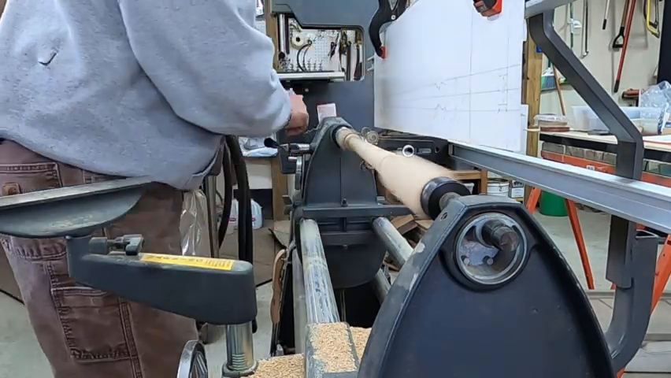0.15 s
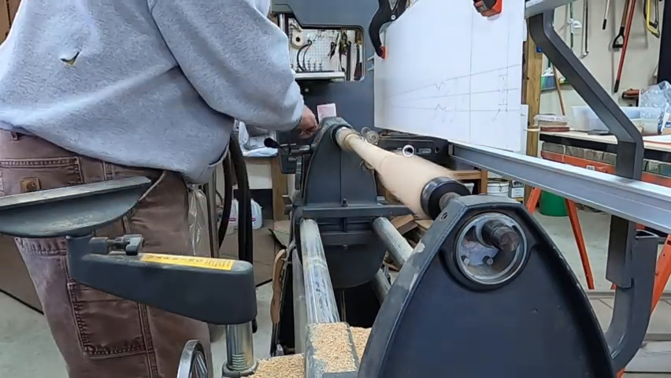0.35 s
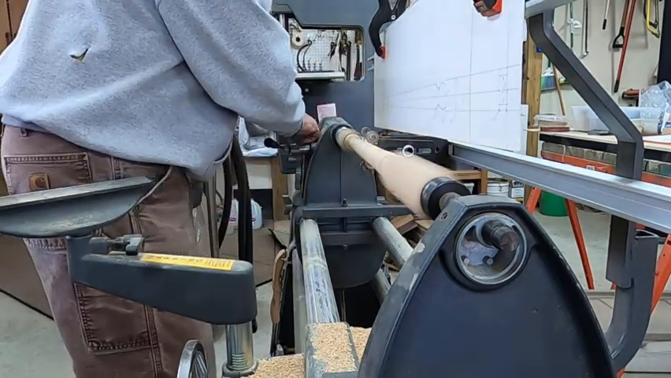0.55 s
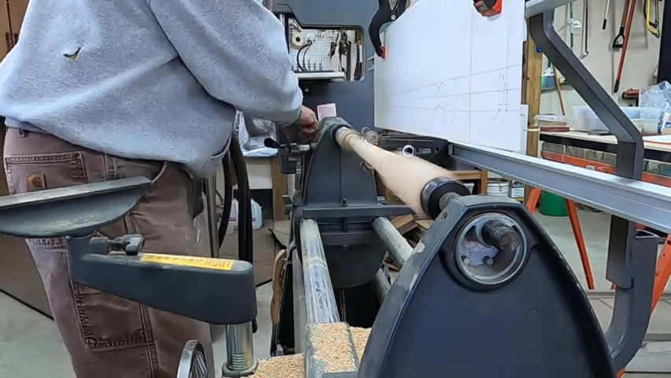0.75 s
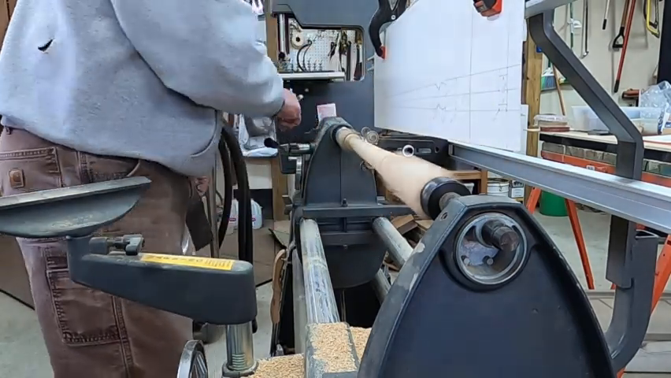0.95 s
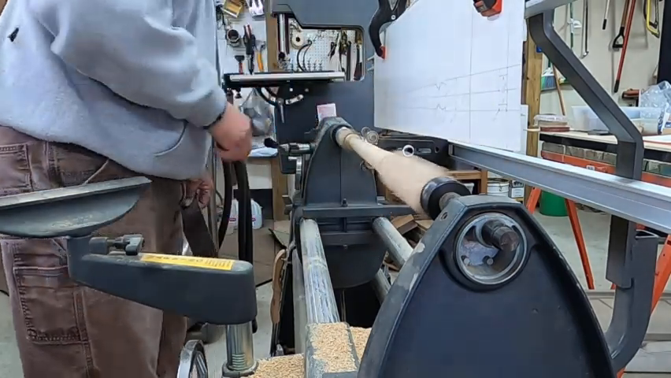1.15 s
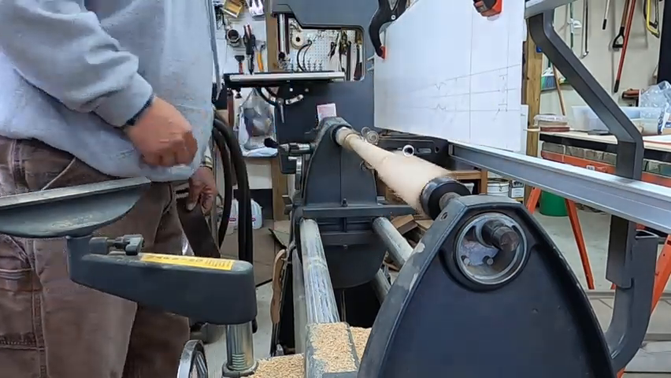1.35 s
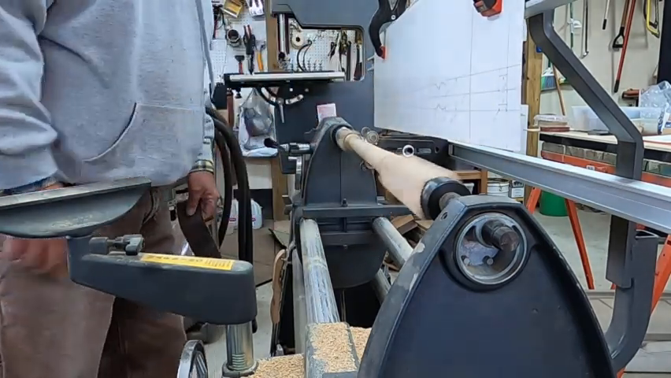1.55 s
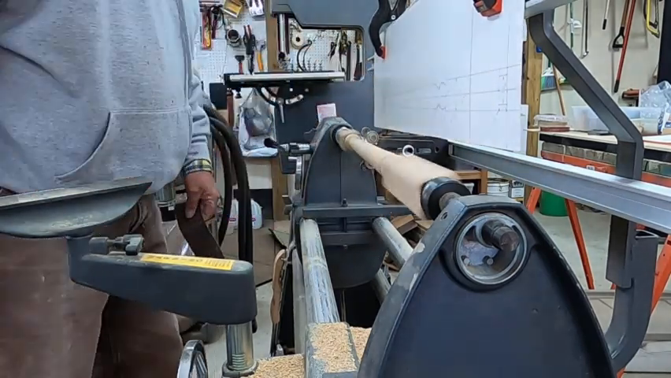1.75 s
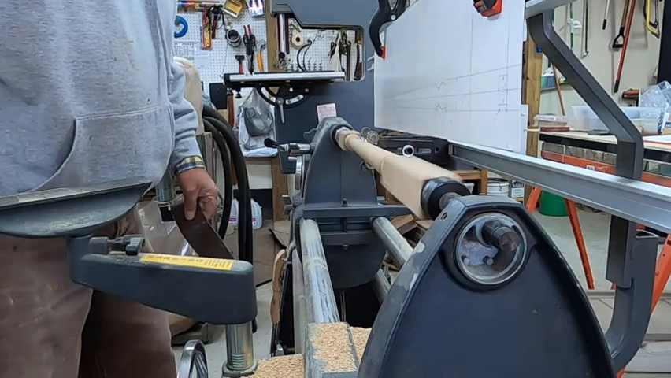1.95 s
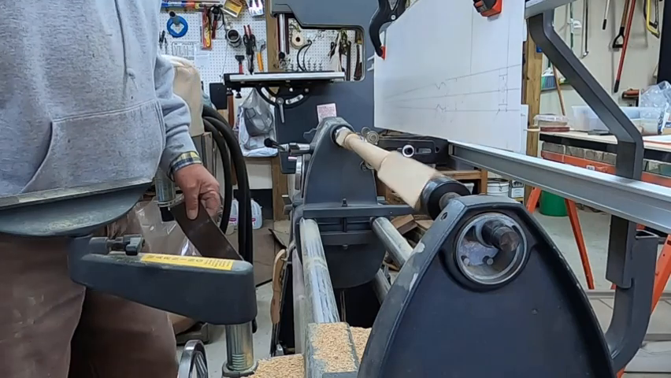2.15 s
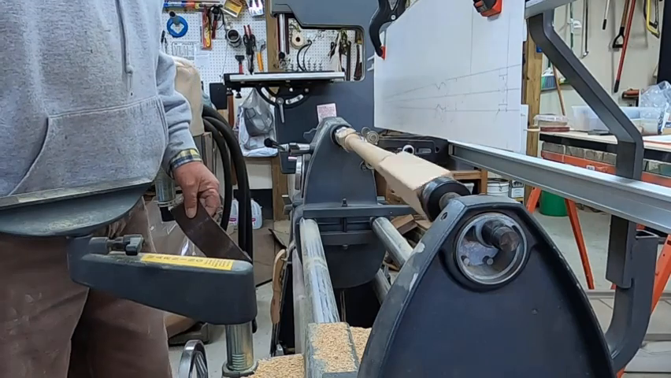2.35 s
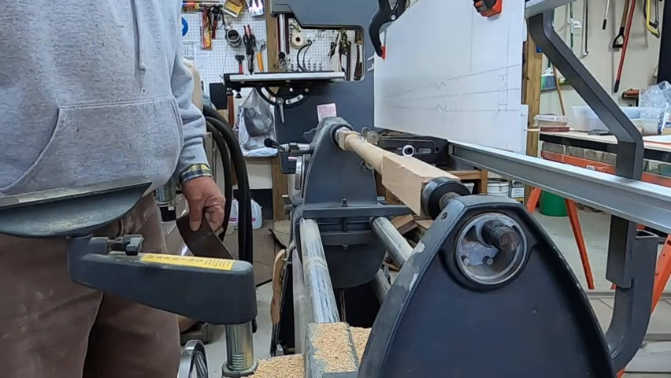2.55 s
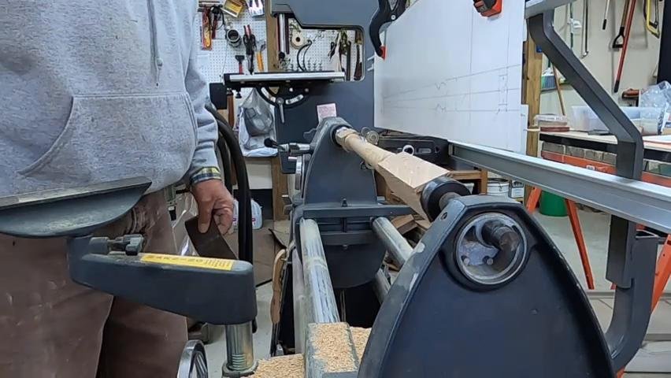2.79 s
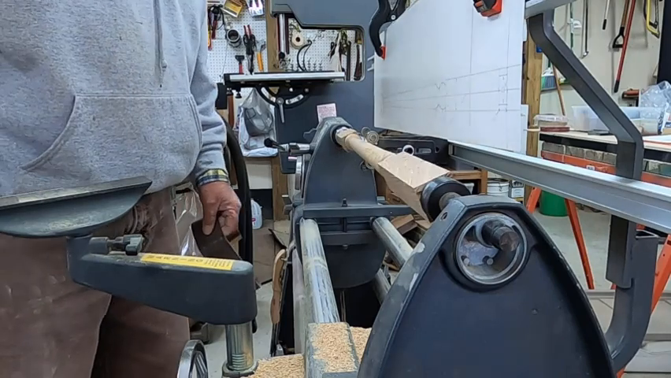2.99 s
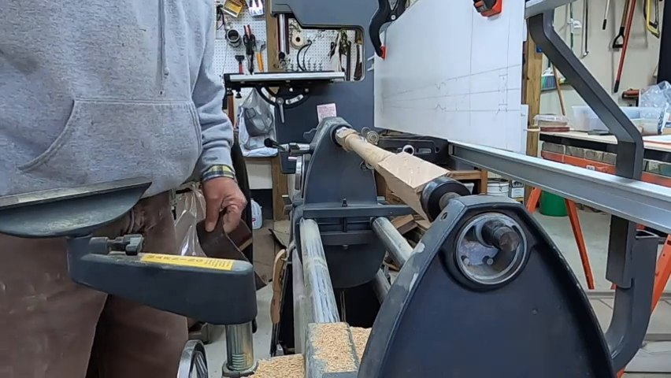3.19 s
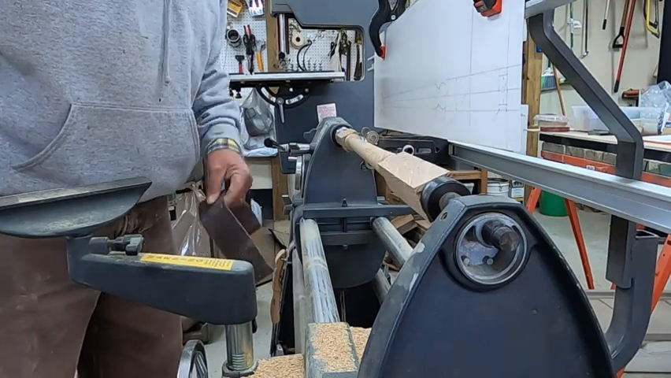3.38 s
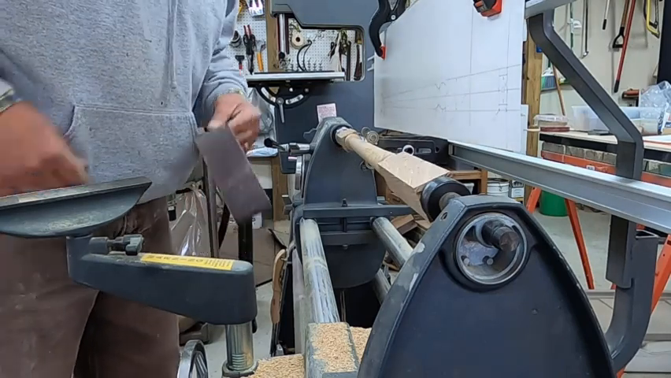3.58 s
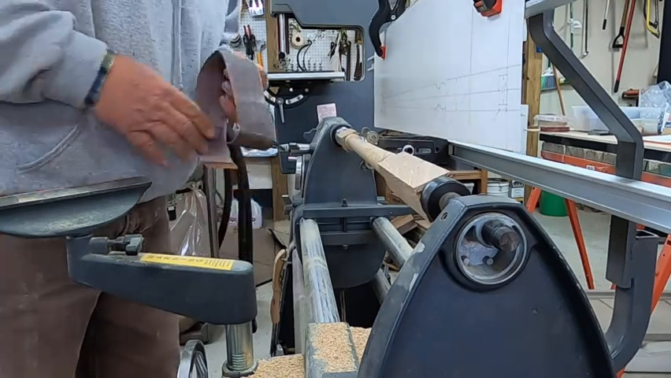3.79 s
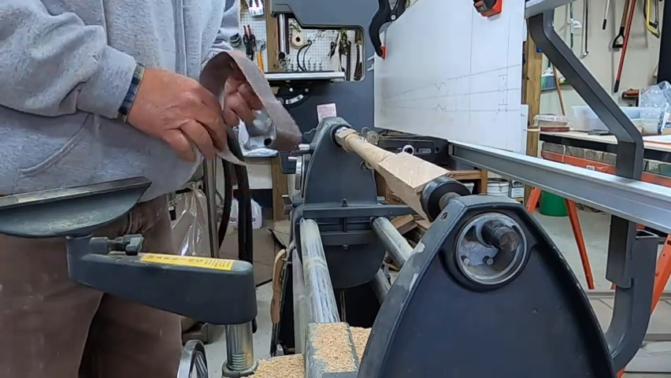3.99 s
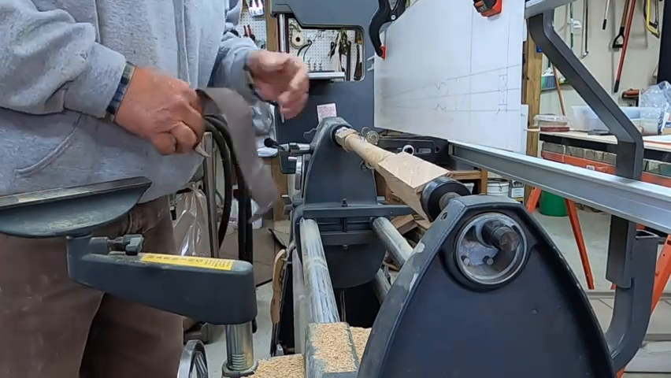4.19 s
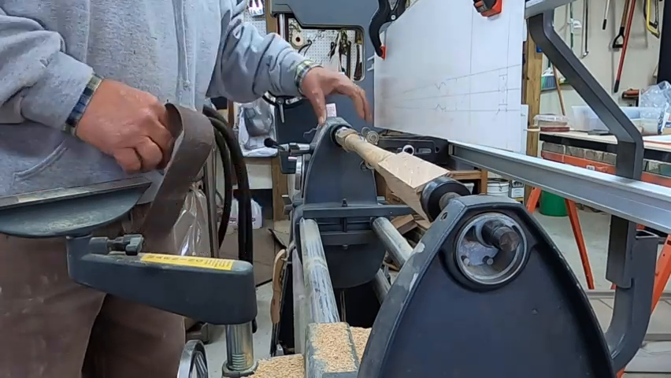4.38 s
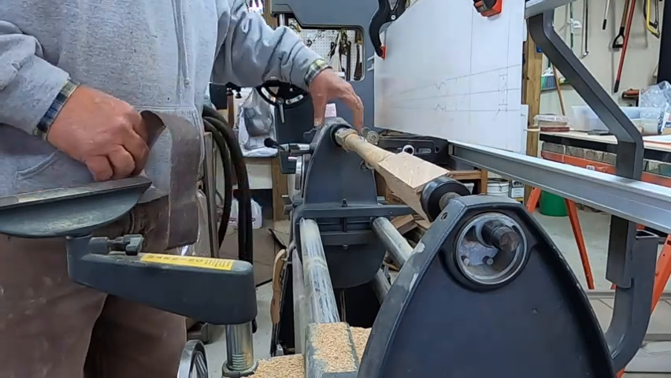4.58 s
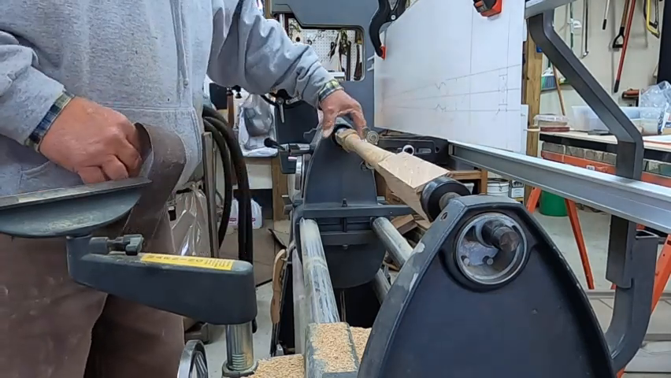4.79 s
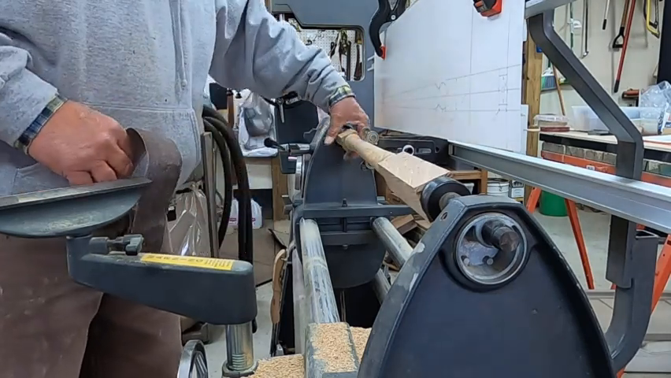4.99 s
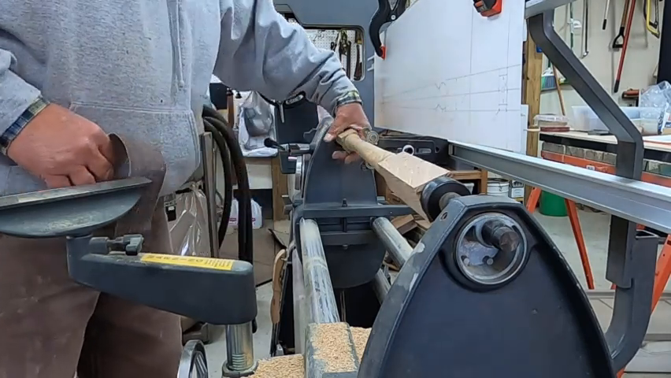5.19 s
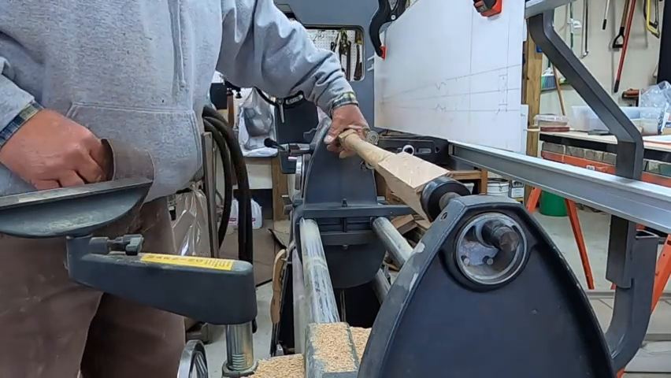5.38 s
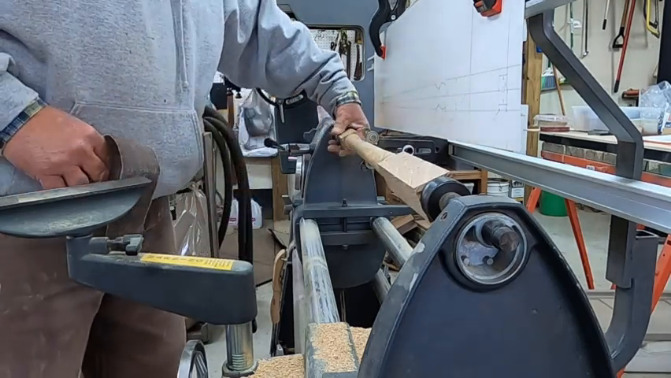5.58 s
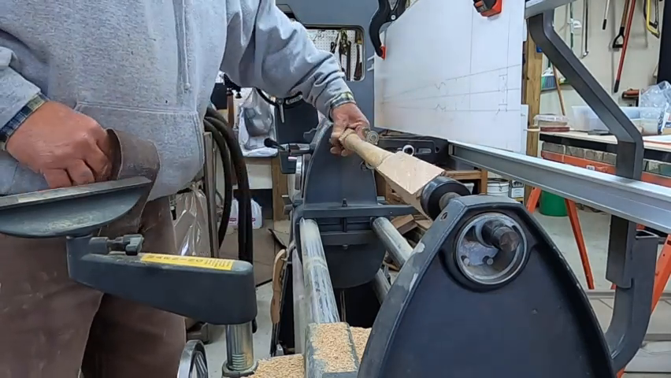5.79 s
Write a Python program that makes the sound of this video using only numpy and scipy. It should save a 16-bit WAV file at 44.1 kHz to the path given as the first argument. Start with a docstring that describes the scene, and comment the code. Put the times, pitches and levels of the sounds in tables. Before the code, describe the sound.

A loud wood lathe whirs at full speed, coasts down to a stop, then sandpaper scuffs and ticks and a hand knocks the wood.

```python
"""A workshop: a wood lathe at full speed coasts to rest, heard by a camera on its bed.
The lathe is coloured noise in five bands, shaken and throbbing with each turn, plus a falling whirr and bed tones.
From late in the coast a strip of sandpaper scuffs, squeaks and ticks: shaped noise and short blurred rings.
A hand grips the wood at the end: rubbing noise and struck modes, a knock and a thud.
Low rumble, soft air hiss and a faint electric hum stay throughout."""
import sys
import numpy as np
from scipy import signal
from scipy.fft import rfft, irfft, next_fast_len
from scipy.io import wavfile
from scipy.ndimage import uniform_filter1d, map_coordinates

SR = 44100
rng = np.random.default_rng(int(sys.argv[2]) if len(sys.argv) > 2 else 0)


def waveform_to_disk(signal):
    """Save audio, clipped to [-1, 1], as 16-bit WAV at the path in sys.argv[1]."""
    frames = np.transpose(np.atleast_2d(signal))
    scaled = np.clip(frames, -1, 1) * 32767
    samples = np.round(scaled).astype(np.int16)
    wavfile.write(sys.argv[1], SR, samples)


N = 257544
TIME = np.arange(N) / SR
STOP_S = 3.04  # lathe noise reaches silence, bed tones start their final decay

# Spindle speed. Each row: time in seconds, turns per second.
SPINDLE_SPEED = [(0, 30.3), (.6, 30.3), (1.2, 21.8), (1.37, 19.1), (1.75, 12.8), (1.9, 11.6), (2.3, 7.5),
                 (2.8, 1), (3.2, .1)]
# Left-right likeness of lathe and grip. Each row: frequency in Hz, likeness from 0 to 1 (negative: opposed).
LATHE_LIKENESS = [(25, -.1), (60, 0.36), (110, 0.51), (200, 0.71), (400, 0.97), (700, 0.94), (1200, 0.83),
                  (2100, 0.77), (3800, 0.67), (5500, 0.17), (12000, .1)]
# Left-right likeness of shop and paper. Each row: frequency in Hz, likeness from 0 to 1.
SHOP_LIKENESS = [(60, 0.97), (110, 1.0), (200, 0.95), (360, 0.98), (650, 0.73), (1170, 0.76), (2120, 0.71),
                 (3850, 0.59), (7000, 0.37), (12000, .1)]
# Balance of shop, paper and grip. Each row: frequency in Hz, left over right in dB.
SHOP_BALANCE = [(60, 0.5), (240, 1), (600, 2.5), (2700, 4), (6900, 2.5), (8300, -5.5), (9600, 2.5),
                (12400, -9.5)]


def amp(db):
    """Decibels to gain."""
    return 10 ** (np.asarray(db) / 20)


def unit(x):
    """x at rms 1."""
    return x / np.sqrt(np.mean(x ** 2) + 1e-20)


def along(points, hz):
    """(Hz, value) points interpolated on a log frequency axis."""
    f, v = np.transpose(points)
    return np.interp(np.log(hz + 1), np.log(f + 1), v)


def curves(rows):
    """One value per sample for each column after the time."""
    s, *cols = np.transpose(rows)
    return [np.interp(TIME, s, c) for c in cols]


def wobble(rate):
    """A smooth random curve, rate knots per second."""
    knots = rng.standard_normal(int(N * rate / SR) + 4)
    return map_coordinates(knots, [TIME * rate])


def filtered(x, response):
    """x times a response of frequency."""
    m = next_fast_len(N + 8192)
    hz = np.fft.rfftfreq(m, 1 / SR)
    return irfft(rfft(x, m) * response(hz), m)[..., :N]


def bumps(rings, hz):
    """Gain of resonances (Hz, width Hz, dB) standing on a flat response."""
    return 1 + sum((amp(db) - 1) / (1 + (2 * (hz - c) / w) ** 2) for c, w, db in rings)


def spread(pair, colour, alike, left):
    """Two unrelated signals become a coloured left and right of given likeness and balance, rms 1."""
    turn = lambda hz: np.arccos(np.clip(along(alike, hz), -1, 1)) / 2
    mid, side = filtered(pair, lambda hz: colour(hz) * [np.cos(turn(hz)), np.sin(turn(hz))])
    balance = lambda hz: amp(np.outer([.5, -.5], along(left, hz)))
    return unit(filtered(np.array([mid + side, mid - side]), balance))


def patchy(patchy_db):
    """Two noises whose strength drifts together in patches of time and pitch."""
    z = signal.stft(rng.standard_normal((2, N)), nperseg=512)[2]
    field = uniform_filter1d(rng.standard_normal(z.shape[1:]), 6, 0)
    field = uniform_filter1d(field, 10, 1)
    return signal.istft(z * amp(patchy_db * unit(field)), nperseg=512)[1][:, :N]


def grit(density, spread_db):
    """Two streams of tiny contacts of uneven size at shared moments, density per second, rms 1."""
    hit = rng.random(N) < density / SR
    size = amp(spread_db * np.minimum(rng.exponential(size=N), 3))
    return unit(hit * size * rng.standard_normal((2, N)))


def swell(s, db, rise, hold, fall_db):
    """Gain that rises (over 1 ms at least), holds and falls by fall_db per second for up to a second."""
    fall_s = np.clip(TIME - s - rise - hold, 0, 1)
    return np.clip((TIME - s) / max(rise, .001), 0, 1) ** 2 * amp(db - fall_db * fall_s)


def lathe():
    """Bearing noise and a once-a-turn pattern shake five parts, fading with speed; a whirr follows the spindle."""
    # Drive levels. Each row: time in seconds, frame rumble, belt and bearing rattle, hiss, all in dB before throb.
    drive = [(0.0, -29, -21, -25.5), (0.48, -32, -21, -25), (.62, -31.5, -21.5, -27),
             (.76, -28.5, -23.5, -26.5), (.86, -30.5, -19.5, -30.5), (1.04, -28.5, -25, -28.5),
             (1.12, -28.5, -24, -31.5), (1.33, -32.5, -24.5, -33), (1.63, -30, -24.5, -34),
             (1.87, -30, -27, -37), (1.92, -31.5, -28.5, -35), (1.97, -30, -33, -39.5),
             (2.02, -32.5, -28, -39), (2.055, -31.5, -34.5, -42), (2.11, -31.5, -29, -42),
             (2.21, -31, -32.5, -42), (2.31, -33.5, -38, -48.5), (2.44, -36, -35, -47),
             (2.49, -37.5, -46, -52), (2.59, -36, -45.5, -54.5), (2.77, -53, -58, -59.5),
             (2.85, -42, -72, -72)]
    # Colours of the five parts. Each row: frequency in Hz, relative dB per Hz.
    stand_colour = [(12, -61), (20, -8.5), (75, -3.5), (113, 1), (170, -1), (220, -30), (370, -120)]
    frame_colour = [(76, -44.5), (130, -29.5), (178, -0.5), (210, 0), (242, -2.5), (313, -5), (450, -11.5),
                    (580, -40), (990, -120)]
    rattle_colour = [(190, -32), (330, -12), (384, -21), (536, -8.5), (680, -1.5), (822, -9), (948, -5),
                     (1240, -5.5), (1440, -10.5), (1750, -19.5), (1950, -32), (2200, -16.5), (2860, -30),
                     (4840, -120)]
    hiss_colour = [(1300, -7), (1720, 6.5), (1980, 0.5), (2300, -0.5), (2900, 1), (3600, -4.5), (4400, -8),
                   (5200, -16), (6500, -23), (7700, -29.5), (8500, -34.5), (10000, -32.5), (11000, -39.5),
                   (13000, -39), (14800, -55), (16000, -89.5)]
    fizz_colour = [(2500, -38), (4000, 2.5), (5500, -0.5), (7000, -21), (8500, -32.5), (11000, -40),
                   (16000, -98)]
    # Ringing machine parts. Each row: frequency in Hz, width in Hz, dB over the broad colour.
    machine_rings = [(74.4, 13, 13), (279, 2.8, 7), (328.7, 15, 7.5), (484, 21, 7.5), (605, 13, 0.5),
                     (680, 12, 2), (716, 4, 6.5), (971, 36, 5), (1129, 10, 4.5), (1236, 10, 6.5),
                     (1274, 24, 4), (1360, 9.9, 3), (1550, 31, 5), (1680, 15, 8), (1782, 20, 8.5),
                     (2120, 18, 7), (2180, 11, 5), (3030, 110, 3), (4200, 600, -1), (7660, 2700, 13)]
    # Lathe balance. Each row: frequency in Hz, left over right in dB.
    lathe_balance = [(25, -15.5), (80, -4.5), (150, -1), (600, 0.4), (1300, -2), (2500, 2), (6900, 2),
                     (8300, -4), (9600, 1), (12400, -4)]
    # Resonances the whirr passes through. Each row: frequency in Hz, width in Hz, gain in dB.
    whirr_body = [(285, 61, 13.5), (440, 130, 10)]
    stand_over_db, stand_follows = -6.5, 0.32  # dB over the frame's top, share of its swing
    fizz_over_db, fizz_follows = -26.5, 0.44  # dB over the hiss's top, share of its swing
    throb_depth_db, throb_lag_rad = 2.4, 2.2
    whirr_cycles_per_turn, whirr_low_hz = 23, 216  # fades below whirr_low_hz
    whirr_db, whirr_from_s, whirr_rise_s = -40.5, 1, 0.12  # dB before body and wobble
    fade_s = 0.58

    speed, = curves(SPINDLE_SPEED)
    angle = 2 * np.pi * np.cumsum(speed) / SR
    orders = np.arange(1, 13)
    phases = 2 * np.pi * rng.random((2, len(orders), 1))
    turning = 0.013 * np.sin(orders[:, None] * angle + phases).sum(axis=1)  # repeats every turn
    # a tight spot passes once a turn
    throb_db = throb_depth_db * np.cos(angle - throb_lag_rad) + 2.34 * wobble(8.72) + 0.96 * wobble(55.03)

    frame_db, rattle_db, hiss_db = curves(drive)
    stand_db = frame_db.max() + stand_over_db + stand_follows * (frame_db - frame_db.max())
    fizz_db = hiss_db.max() + fizz_over_db + fizz_follows * (hiss_db - hiss_db.max())
    # each part: level dB, colour, share of throb, patchiness dB
    parts = [(stand_db, stand_colour, 0.23, .6), (frame_db, frame_colour, 0.23, 0.7),
             (rattle_db, rattle_colour, 0.45, 0.26), (hiss_db, hiss_colour, 0.29, 1.22),
             (fizz_db, fizz_colour, 0.47, 1.6)]
    sound = 0
    for level_db, colour, throb, patchy_db in parts:
        shake = patchy(patchy_db) + turning + 0.48 * grit(700, spread_db=2.5)
        response = lambda hz: amp(along(colour, hz)) * bumps(machine_rings, hz)
        part = spread(shake, response, LATHE_LIKENESS, lathe_balance)
        sound = sound + amp(level_db + throb * throb_db) * part

    pitch_hz = whirr_cycles_per_turn * speed
    loud = swell(whirr_from_s, whirr_db, whirr_rise_s, 9, 0) * bumps(whirr_body, pitch_hz)
    loud = loud / (1 + (whirr_low_hz / pitch_hz) ** 8)
    flutter = amp(1.2 * wobble(14) + 2 * np.cos(angle))
    whirr = loud * flutter * np.sin(whirr_cycles_per_turn * angle + .8 * wobble(35))
    return sound * np.clip((STOP_S - TIME) / fade_s, 0, 1) + whirr


def drone():
    """Three long-ringing modes of the steel bed hum near fixed pitches, least steady while coasting."""
    # Mode levels. Each row: time in seconds, dB of the 212, 139 and 679 Hz mode before wobble and final decay.
    mode_levels = [(0, -26.5, -42.5, -30.5), (.3, -22.5, -32, -30.5), (.66, -26, -37, -29),
                   (.78, -34.5, -60, -21), (.85, -29.5, -39.5, -36), (.92, -25, -33.5, -27),
                   (1.0, -42, -45, -25.5), (1.14, -43, -31, -28.5), (1.25, -54, -44, -23),
                   (1.36, -24.5, -39.5, -26), (1.52, -43, -36, -35), (1.6, -38, -38, -30),
                   (1.69, -23, -44, -27.5), (1.76, -32, -46, -36), (2.05, -35, -42, -37.5),
                   (2.23, -41, -41, -40), (2.29, -35, -40, -35), (2.37, -30.5, -43, -44),
                   (2.45, -31.5, -39, -49), (2.8, -41, -41.5, -80), (3.05, -47.5, -45, -84)]
    # Bed modes. Each row: frequency in Hz, wander in Hz.
    bed_modes = [(212, .6), (139, .8), (679, 4)]
    stop_db_per_s = 150
    speed, = curves(SPINDLE_SPEED)
    unsteady_db = 1.8 * np.sin(np.pi * speed / speed[0]) + 0.43
    sound = 0
    for level_db, (hz, wander_hz) in zip(curves(mode_levels), bed_modes):
        phase = 2 * np.pi * np.cumsum(hz + wander_hz * wobble(8.04)) / SR
        wobble_db = unsteady_db * wobble(15) + hz / 500 * wobble(27.76)
        sound = sound + amp(level_db + wobble_db) * np.sin(phase)
    return sound * amp(-stop_db_per_s * np.clip(TIME - STOP_S, 0, 1))


def shop():
    """Low rumble and soft hiss of the building, as resonant noise, with an electric hum of wavering sines."""
    # Rumble and air colours. Each row: frequency in Hz, relative dB per Hz.
    rumble_colour = [(12, -39), (20, -1.5), (75, -2), (114, -10.5), (172, 1.5), (248, -7.5), (300, -11),
                     (614, -18.5), (720, -28), (900, -37), (1170, -54.5), (1980, -120)]
    air_colour = [(500, -39), (800, -7.5), (1300, -4), (1800, -11), (2300, -12), (3000, -17), (4000, -20),
                  (5500, -19.5), (7000, -23.5), (7800, -27.5), (8600, -36), (10500, -42.5), (13000, -46),
                  (16000, -66)]
    # Room resonances. Each row: frequency in Hz, width in Hz, dB over the colour.
    room_rings = [(75.5, 9.4, 9), (174.2, 5.5, 5), (323, 41, 6), (463, 23, 7), (680, 13, 9), (1040, 6.2, 9),
                  (1530, 9.4, 12.5)]
    # Hum partials. Each row: frequency in Hz, peak level in dB before wobble.
    hum_partials = [(301, -57.5), (602, -63), (900, -70), (1200, -71)]
    rumble_db, air_db = -44.5, -59.5  # before wobble
    colour = lambda points: lambda hz: amp(along(points, hz)) * bumps(room_rings, hz)
    rumble = spread(patchy(patchy_db=1.0), colour(rumble_colour), SHOP_LIKENESS, SHOP_BALANCE)
    air = spread(patchy(patchy_db=0.9), colour(air_colour), SHOP_LIKENESS, SHOP_BALANCE)
    hum = 0
    for hz, db in hum_partials:
        gain = amp(db + 1.2 * wobble(6.5))
        hum = hum + gain * np.sin(2 * np.pi * (hz * TIME + 0.13 * wobble(4.3)))
    return amp(rumble_db + 1.5 * wobble(3.35)) * rumble + amp(air_db + 0.25 * wobble(3.7)) * air + hum


def paper():
    """Grit drags in scuffs of varied thinness, the bent strip squeaks near one pitch, grains and edge tick."""
    # Scuffs. Each row: start in seconds, level in dB before thinning, rise in seconds, hold in seconds,
    # fall in dB per second, thinness from 0 to 1, sizzle of the finest grit in dB (0: unchanged).
    scuffs = [(1.76, -37.5, 0.0077, 0.0072, 305, 0.4, -1), (1.865, -39, 0.028, 0.021, 251, 0.2, -14),
              (2.17, -60.5, .018, 0.018, 291, 0.5, -10), (2.397, -35.5, 0.011, 0.03, 498, 1, -8),
              (2.74, -56, 0.0042, 0.0091, 350, 0.5, -2), (3.705, -60.5, .004, 0.012, 200, 0, -8),
              (3.832, -54.5, 0.039, .01, 300, 0.4, -2), (3.887, -44, .002, 0.0022, 900, 0.26, -1),
              (3.907, -51, 0.012, .01, 189, 0.3, -5), (4.019, -58.5, 0.016, 0.1, 252, 0.2, 1),
              (4.165, -45.5, 0.037, 0.025, 700, 0.44, 4.5), (4.243, -55, .02, .018, 300, 0.8, -4),
              (4.345, -38.5, 0.0024, 0.032, 300, 0.6, 3.5), (4.355, -43, 0.008, 0.01, 300, 0.5, 1),
              (4.402, -60, .006, 0.0054, 400, 0.1, -9), (4.437, -53.5, 0.026, 0.049, 450, 0.3, 4.5),
              (4.675, -60.5, 0.028, .032, 200, .95, -2), (4.837, -57, .027, .011, 300, 1, -2),
              (4.904, -48, 0.0044, 0.043, 600, 1, -5), (4.998, -57, .003, .01, 200, 0, -17),
              (5.083, -63, 0.02, 0.27, 100, 0.73, -2), (5.354, -56.5, 0.033, 0.055, 500, 0.25, -2)]
    # Paper colour. Each row: frequency in Hz, relative dB per Hz.
    paper_colour = [(600, -11), (1100, -8), (1500, -1.5), (2000, -5.5), (2600, -6.5), (3300, -8),
                    (4200, -8), (5500, -10.5), (7000, -12.5), (8000, -18), (9000, -21), (11000, -32.5),
                    (13000, -36), (14800, -46), (16000, -68)]
    # Squeaks. Each row: start in seconds, level in dB, pitch in Hz, half-width in Hz, rise in seconds,
    # hold in seconds, fall in dB per second.
    squeaks = [(2.403, -38, 3450, 700, 0.0083, 0.0081, 498), (4.044, -58.5, 3660, 130, 0.017, 0.028, 700),
               (4.349, -49, 2200, 350, .002, .006, 700), (4.351, -49, 4030, 300, .004, .008, 500),
               (4.366, -45, 2540, 250, 0.0073, 0.019, 502), (4.397, -49, 1600, 300, .004, .006, 600)]
    # Ticks. Each row: start in seconds, peak in dB before onset and filter, pitch in Hz,
    # 60 dB decay in seconds (.003 at least).
    tick_rows = [(3.4605, -52, 6000, .012), (3.6545, -37.5, 2090, 0.017), (3.7055, -38, 2500, .005),
                 (3.7105, -35.5, 2700, 0.0055), (3.888, -34, 5500, 0.019), (3.888, -36, 2180, 0.014),
                 (3.889, -39, 3760, 0.013), (4.05, -40, 3520, 0.013), (4.05, -33, 1250, .016),
                 (4.132, -49, 3680, .04), (5.003, -50, 4120, 0.04), (5.099, -53, 4020, 0.043),
                 (5.1627, -40, 7200, 0.01), (5.3333, -42.5, 7400, 0.021), (5.45, -43, 7750, 0.016)]
    paper_rings = [(2420, 210, 4.3), (3900, 230, 1.7), (7700, 520, 6.3)]  # Hz, width Hz, dB

    crinkle = amp(0.86 * wobble(90))
    drag = crinkle * (patchy(patchy_db=2.5) + 0.34 * grit(1400, spread_db=-1.5))
    response = lambda hz: amp(along(paper_colour, hz)) * bumps(paper_rings, hz)
    full = spread(drag, response, SHOP_LIKENESS, SHOP_BALANCE)
    thin = filtered(full, lambda hz: hz ** 2 / (hz ** 2 + 4000 ** 2))
    sizzle = filtered(full, lambda hz: hz ** 12 / (hz ** 12 + 6900.0 ** 12))
    sound = 0
    for s, db, rise, hold, fall, thinness, sizzle_db in scuffs:
        share = np.clip(thinness, 0, 1)
        scuff = (1 - share) * full + share * thin + (amp(sizzle_db) - 1) * sizzle
        sound = sound + swell(s, db, rise, hold, fall) * scuff

    for s, db, pitch_hz, half_width_hz, rise, hold, fall in squeaks:
        rub = [[1, 0.41], [1, -0.54]] @ rng.standard_normal((2, N))  # partly alike left and right
        squeak = unit(filtered(rub, lambda hz: 1 / (1 + ((hz - pitch_hz) / half_width_hz) ** 2)))
        sound = sound + swell(s, db, rise, hold, fall) * squeak

    ticks = np.zeros((2, N + SR))
    t = np.arange(SR // 10) / SR
    for s, db, hz, t60 in tick_rows:
        jitter = [[1, 0.26], [1, -0.28]] @ rng.standard_normal((2, len(t)))
        blur = np.cumsum(0.31 * hz / 6000 * jitter, axis=1)  # random phase walk blurs the pitch
        ring = np.sin(2 * np.pi * hz * t + blur)
        envelope = amp(db - 60 * t / max(t60, .003)) * (1 - np.exp(-t / 0.00017))
        ticks[:, round(s * SR):][:, :len(t)] += envelope * ring
    band = lambda hz: hz ** 2 / (hz ** 2 + 1500 ** 2) / (1 + (hz / 8800) ** 12)
    return sound + filtered(ticks[:, :N], band)


def grip():
    """The palm lands and slides: each landing strikes the wood's modes, uneven contacts keep them ringing."""
    # Contacts. Each row: start in seconds, knock level in dB, thud level in dB, rise in seconds,
    # fall in dB per second.
    contacts = [(5, -38, -47.5, 0.00067, 300), (5.0225, -49, -44, 0.0011, 800),
                (5.04, -56, -45.5, 0.026, 58), (5.094, -51, -56, 0.0046, 200),
                (5.106, -55, -48, 0.003, 250)]
    # High modes (knock) and low modes (thud). Each row: frequency in Hz, width in Hz, relative level in dB.
    knock_modes = [(800, 150, -19), (1040, 220, 5), (1290, 250, -3), (1570, 330, 3)]
    thud_modes = [(318, 270, -5), (467, 18, -5), (660, 84, -5)]
    blow_over_db, blow_softens_db_per_s = -9, 1497.5  # blow over contact level, less per second of rise
    flesh_s = .0006  # the soft palm rounds the blow
    sound = 0
    for k, modes in enumerate((knock_modes, thud_modes)):
        peaks = lambda f: sum(amp(db) / (1 + (2 * (f - c) / w) ** 2) for c, w, db in modes)
        ring = lambda f: peaks(f) / (1 + (f / 1850) ** 6)
        rub = patchy(patchy_db=-1.0) + 0.16 * grit(2000, spread_db=-4.0)
        gain = sum(swell(s, db[k], rise, 0, fall) for s, *db, rise, fall in contacts)
        sound = sound + gain * spread(rub, ring, LATHE_LIKENESS, SHOP_BALANCE)
        for s, *db, rise, fall in contacts:
            t = np.clip(TIME - s - rise, 0, 1)
            struck = 0
            for c, w, level in modes:
                decay = np.exp(-np.pi * w * t / 2)
                struck = struck + amp(level + rng.normal(0, 2)) * decay * np.sin(2 * np.pi * c * t)
            blow = amp(db[k] + blow_over_db - blow_softens_db_per_s * rise)
            sound = sound + blow * struck * (1 - np.exp(-t / flesh_s)) ** 2
    return sound


def scene():
    """All sources."""
    return lathe() + drone() + shop() + paper() + grip()


def record(dry):
    """Sound reaches the camera's two ports slightly apart in phase; nothing passes above its band limit."""
    # Phase between ports. Each row: frequency in Hz, left lead in radians.
    port_lead = [(0, 0.16), (1550, -0.27), (2670, -0.48), (3010, -0.47), (3450, -0.54), (4050, -1)]
    top_hz = 15500
    phase = lambda hz: np.outer([.5, -.5], along(port_lead, hz) * (hz > 0))
    return filtered(dry, lambda hz: (hz < top_hz) * np.exp(1j * phase(hz)))


dry = scene()
out = record(dry)
waveform_to_disk(out)
```